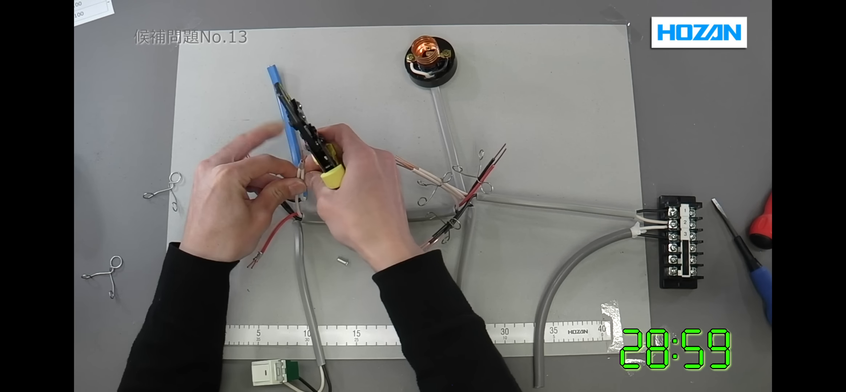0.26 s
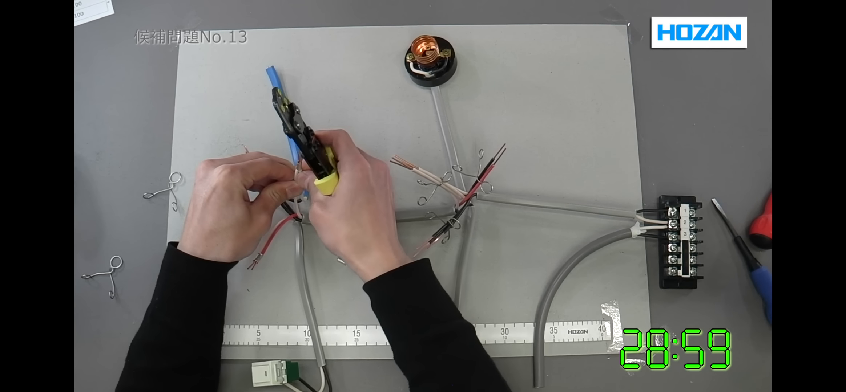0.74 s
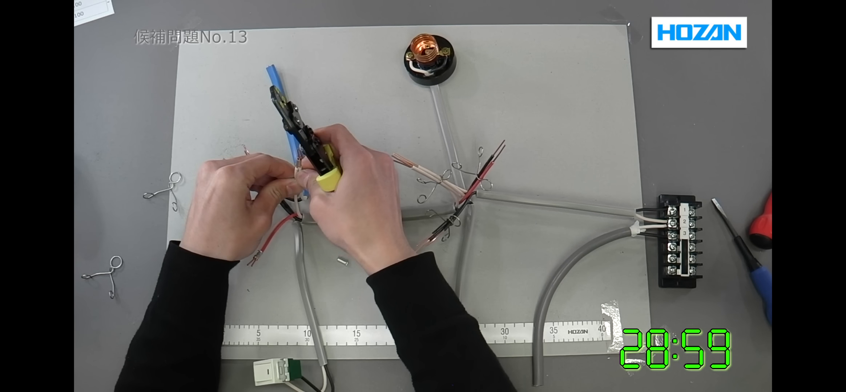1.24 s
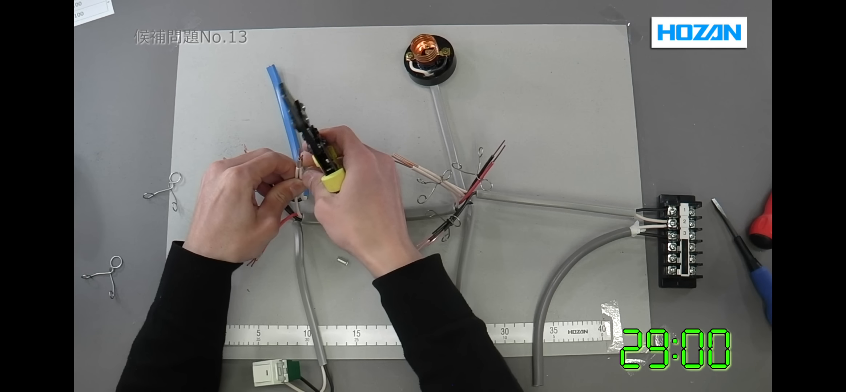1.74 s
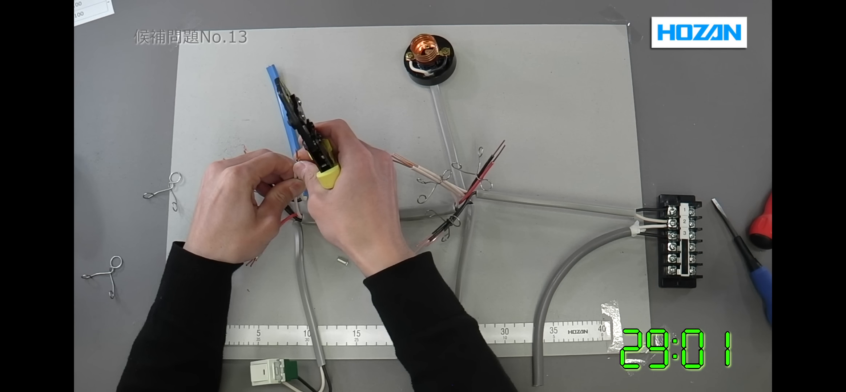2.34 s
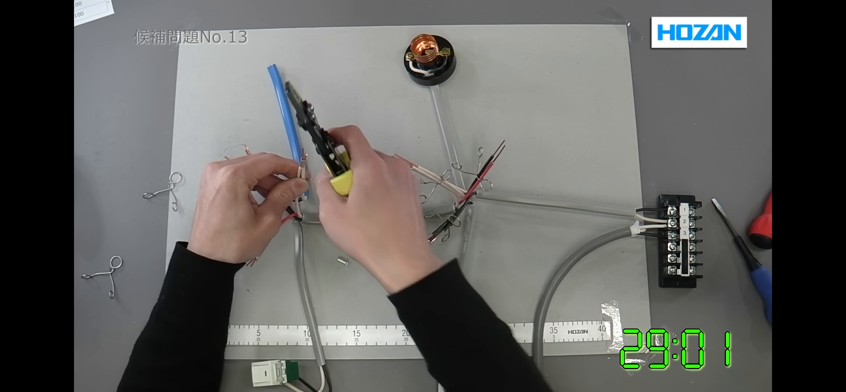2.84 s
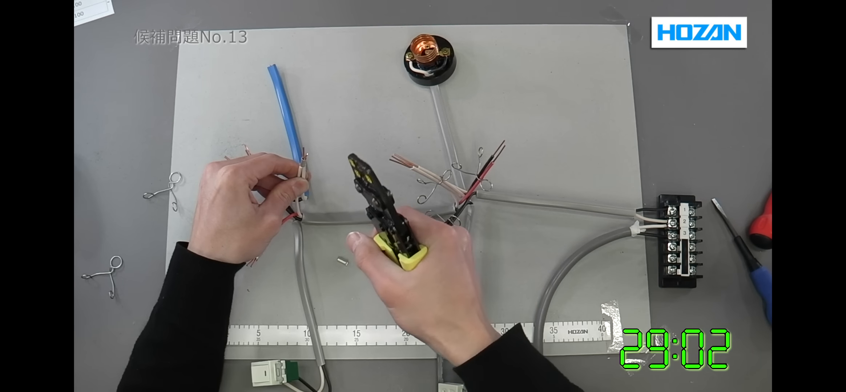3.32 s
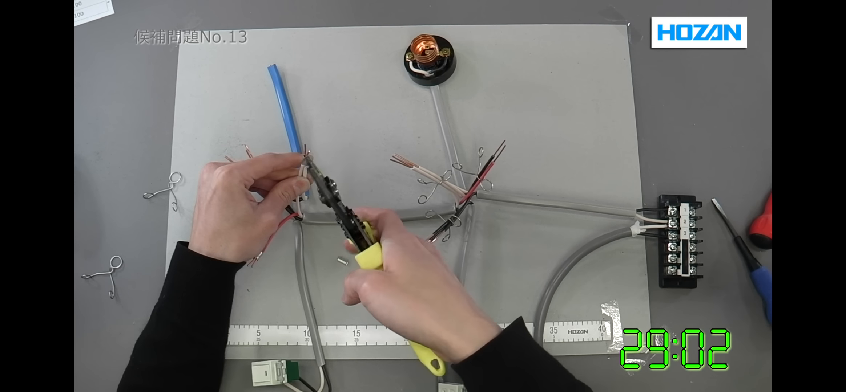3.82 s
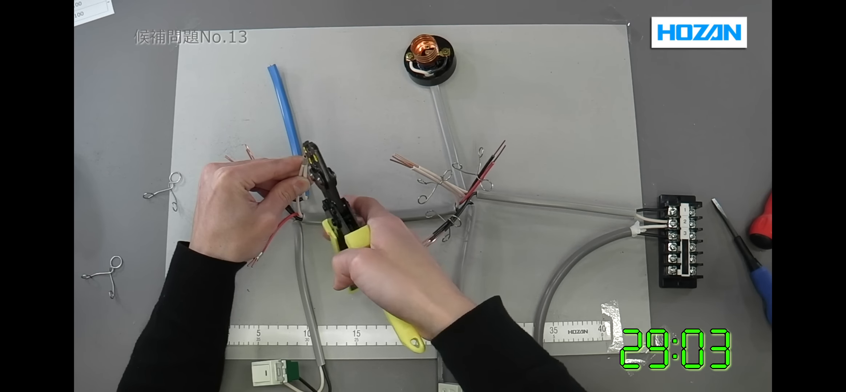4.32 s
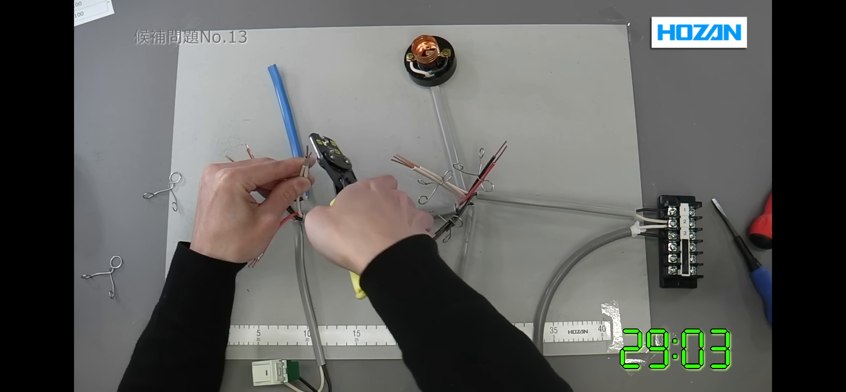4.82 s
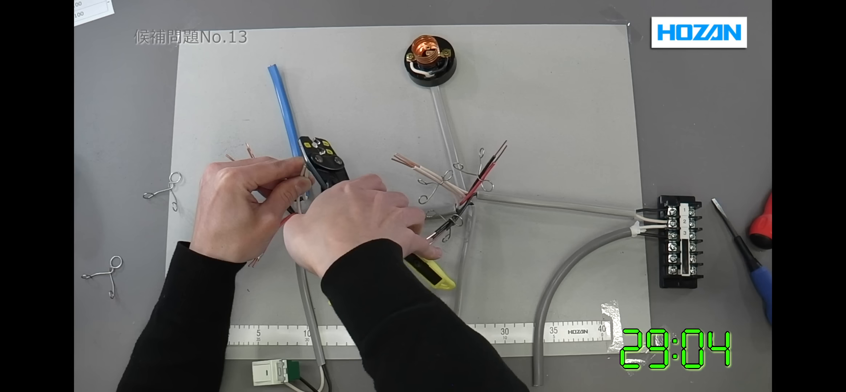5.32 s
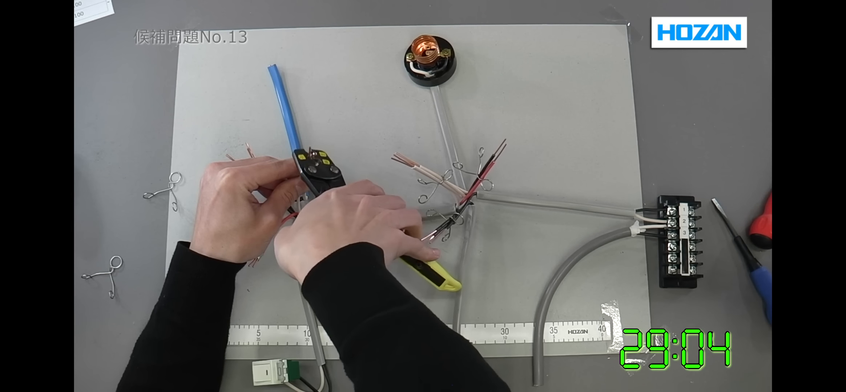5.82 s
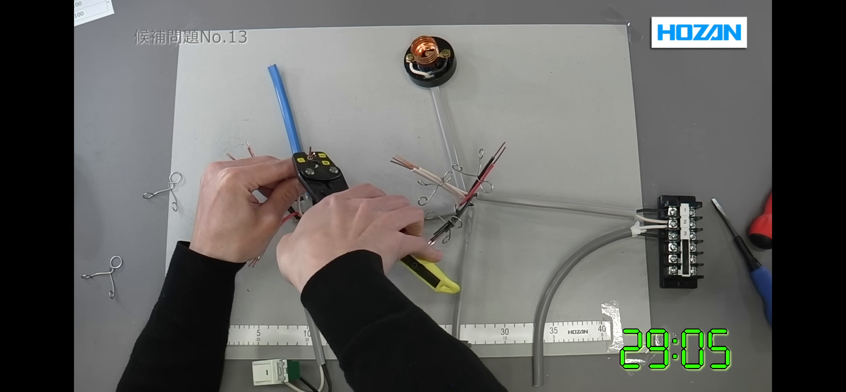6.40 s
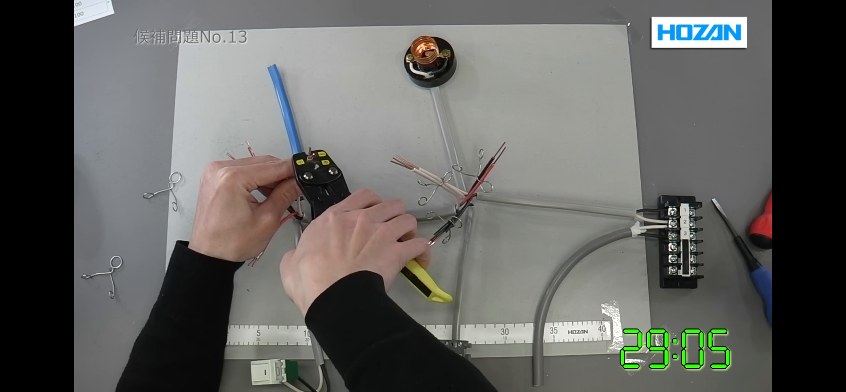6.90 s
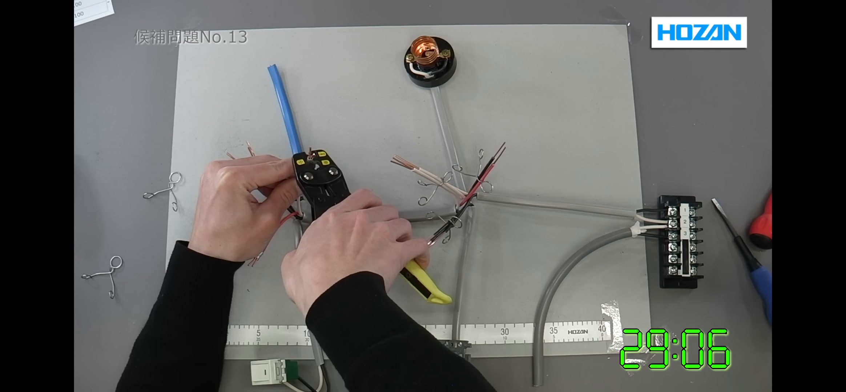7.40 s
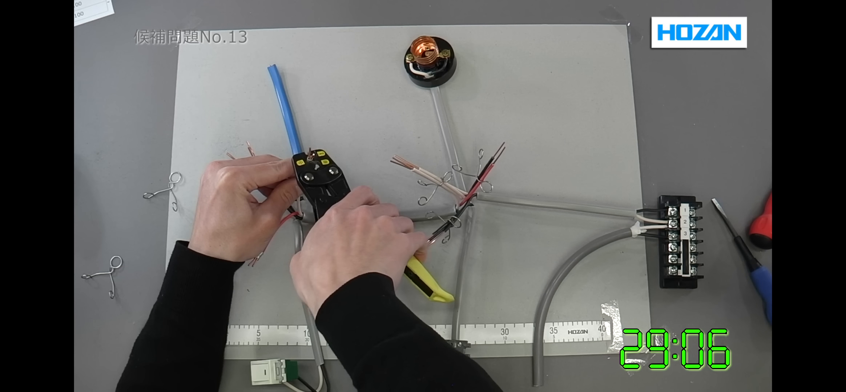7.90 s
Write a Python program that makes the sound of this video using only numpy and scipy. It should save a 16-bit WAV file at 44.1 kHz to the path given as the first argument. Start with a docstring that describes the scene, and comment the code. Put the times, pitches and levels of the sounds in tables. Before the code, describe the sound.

In a small, quiet room with a steady murmur of ventilation, someone works a ratchet crimping tool close to the microphone. After light ticks of wire handling come two bright metallic snaps, a rapid rasp of ratchet teeth and a clack as the handles open. The tool and hands then bump softly on a wooden board, and after a lull the ratchet catches once more.

```python
"""In a small, quiet room, a steel ratchet crimper is worked over a wooden practice board.
The pawl snaps twice, runs over its teeth and lets go, each impact exciting the damped modes of the steel,
and the handles spring open against their stop. Fingers tick and rub on stiff wires, the tool bumps the
board, and the first tooth of the next squeeze catches. Ventilation murmurs underneath."""
import sys
import numpy as np
from scipy import signal
from scipy.fft import rfft, irfft, next_fast_len
from scipy.io import wavfile
from scipy.ndimage import uniform_filter1d

SR = 44100
rng = np.random.default_rng(int(sys.argv[2]) if len(sys.argv) > 2 else 0)


def persist_wave(psi):
    """Save psi, clipped to +-1, as 16-bit WAV."""
    counts = np.round(np.clip(psi, -1, 1) * 32767).astype(np.int16)
    wavfile.write(sys.argv[1], SR, np.atleast_2d(counts).T)


N = 359415
T = np.arange(N) / SR
HIT_T = T[:SR // 4]  # time axis of one short event

# spectrum of steel striking steel: (frequency [Hz], relative level [dB])
CRACK_SPECTRUM = [(400, -20.5), (800, -23.5), (1400, -17), (2000, -10), (2900, -6), (5000, -4.5),
                  (9000, -1), (14000, 0.5), (16500, -5)]


def ratchet(colour, level_db=4, tooth_lowest_hz=2450, tooth_contact_s=0.00092):
    """Impact train: the pawl scrapes over each tooth and drops. `colour` scales each click's own peaks."""
    # heavy snaps, whose resonances shift with jaw opening and grip: (time [s], relative level [dB],
    # low cutoff [Hz], contact time [s], list of (frequency [Hz], gain at colour 1 [dB], width [octaves]))
    snaps = [(3.2113, -12.5, 1598, 0.00085, [(2008, 8, .064), (2430, -5.5, .045), (3200, 2, .08),
             (4350, 9, 0.12), (6200, 0.5, .2), (8030, -5, .05), (12500, 7.5, .19)]),
             (3.328, -9, 1107, 0.0008, [(2230, 9, .055), (2650, -8.5, .04), (3384, -12, .045),
             (6000, 9, 0.19), (7700, -7.5, .04), (9200, 4, 0.11), (14300, 5.5, .12)]),
             (3.938, -9.5, 453.5, .00055, [(1993, 4, .064), (2850, 6, .07), (3500, 8, 0.14),
             (6000, -3.5, .1), (10510, 5.5, .19)]), (8.1354, -13, 2600, 0.00048, [(3120, 2.5, .064),
             (5400, 5.5, .2), (6900, -3, .04), (13400, 3, .2)])]
    # the run over the rack: (time [s], relative level [dB], ring frequency [Hz])
    teeth = [(3.6433, -16, 12000), (3.6561, -15.5, 7900), (3.6735, -16, 7700), (3.7057, -17, 8000),
             (3.731, -14, 9300), (3.7481, -16, 9300), (3.7658, -16, 9000), (3.7804, -17, 9400),
             (3.7972, -17.5, 12500), (3.799, -19, 9500)]
    # peaks and a dip common to the whole run: (frequency [Hz], gain [dB], width [octaves])
    run_resonances = [(1650, 11, 0.11), (2560, 4, .05), (10900, -5, .05), (12800, 4.5, .17)]
    clicks = []
    for start, db, lowest_hz, contact_s, peaks in snaps:
        tilt_db = -2 + 1.37 * np.log2(tooth_lowest_hz / lowest_hz)  # a deeper snap is also fuller
        resonances = [(hz, colour * peak_db, octaves) for hz, peak_db, octaves in peaks]
        clicks.append((start, db, pawl_click(tilt_db, lowest_hz, contact_s, resonances)))
    run_tilts_db = np.linspace(-1, 0.5, len(teeth))  # the clicks gain body along the rack
    towards_left = undb([[0.75], [-0.75]])
    for (start, db, ring_hz), tilt_db in zip(teeth, run_tilts_db):
        resonances = run_resonances + [(ring_hz, colour * 8, 0.14)]
        click = pawl_click(tilt_db, tooth_lowest_hz, tooth_contact_s, resonances)
        clicks.append((start, db, towards_left * click))
    out = np.zeros((2, N))
    lead_t = T[:SR // 200]
    for start, db, click in clicks:
        add(out, start - lead_t[-1], undb(db - 21) * pawl_scrape(lead_t))
        add(out, start, undb(db) * click)
    return undb(level_db) * out


def pawl_click(tilt_db, lowest_hz, contact_s, resonances, ring_db=-7):
    """Impact excitation: a broadband crack and the very short free vibration of hand-damped steel."""
    # modes of the jaws and side plates: (frequency [Hz], relative level [dB], T60 [s])
    steel_modes = [(2997, -6, 0.0063), (3600, -10.5, 0.0061), (4300, -1, 0.01), (5380, -0.5, 0.011),
                   (6600, -5.5, 0.011), (7775, -4.5, 0.011), (8750, 1.5, 0.022), (9220, 3, 0.012),
                   (9370, 5, 0.01), (10020, 3.5, 0.012), (10900, -1.5, .014), (12096, 10.5, 0.0063),
                   (13200, -1, 0.014), (15000, 4, 0.0073), (15300, -0.5, .008)]
    t = T[:SR // 30]
    crack = shape(burst(t, contact_s, side=0.34), lambda f: curve(CRACK_SPECTRUM, f))
    steel = ring(steel_modes, t, scatter_db=2.5, detune=0.003, spread=0.2)
    snap = unit_energy(crack) + undb(ring_db) * unit_energy(steel)

    def body_db(f):
        """Spectral tilt: a heavier blow moves more of the tool and reaches further into the bass."""
        octaves_down = np.clip(np.log2(9000 / (f + 1)), 0, 2.5)
        return tilt_db * octaves_down - 10 * np.log10(1 + (lowest_hz / (f + 100)) ** 13)

    snap = shape(snap, body_db)
    snap = shape(snap, lambda f: sum(db * undb(hump(f, hz, octaves)) for hz, db, octaves in resonances))
    return unit_energy(snap)


def pawl_scrape(t, rise_s=0.0009):
    """Sliding friction: noise swells as the pawl crosses a tooth tip."""
    swell = stereo_noise(len(t), side=0.4) * np.exp(-t[::-1] / rise_s)
    return unit_energy(shape(swell, lambda f: curve(CRACK_SPECTRUM, f)))


def handle_stop(start=3.9382, rattle_lag_s=0.0089):
    """Impact and chatter: the handles knock hollowly on their stop, then the loose links rattle."""
    out = np.zeros((2, N))
    add(out, start, undb(-29) * tick(hz=720, octaves=0.87, decay_s=0.0063))
    add(out, start + rattle_lag_s, undb(-19.5) * tick(hz=10340, octaves=0.15, decay_s=0.0067))
    return out


def board_bumps(thud_gain_db=8, click_gain_db=4, clack_db=-9.5, lowest_hz=65):
    """Modal response: softer blows excite only the low modes; a small board radiates little deep bass."""
    # bumps of hand and tool: (time [s], relative thud level [dB], thud cutoff [Hz],
    # relative click level [dB], click centre [Hz], click width [octaves])
    bumps = [(.157, -41.5, 1400, -50, 1740, 0.26), (0.22, -32.5, 70, -57.5, 3600, 0.41),
             (5.002, -36, 499, -51, 7000, 1.1), (5.016, -37, 1090, -49, 2100, 0.23),
             (5.052, -41.5, 700, -68, 3000, 1.2), (5.466, -35, 760, -51.5, 1600, 0.26),
             (5.579, -35, 300, -58, 9000, 0.6), (5.6849, -23.5, 900, -39, 1400, 0.28),
             (5.6942, -29, 250, -57, 810, 0.59), (5.8736, -29.5, 400, -40.5, 1774, 0.23)]
    # modes of the board on its table: (frequency [Hz], relative level [dB], T60 [s])
    board_modes = [(80, -12, 0.13), (111.6, 0, 0.15), (164, -4, 0.11), (217, 9.5, 0.15), (294, -5.5, 0.2),
                   (375, -5.5, 0.087), (582, -5, 0.095), (663, -6, 0.17), (768, -1, 0.068), (842, -5, 0.08),
                   (932, -12, 0.051), (1040, -5.5, 0.052), (1350, -13, 0.037)]
    out = np.zeros((2, N))
    for start, thud_db, cutoff_hz, click_db, click_hz, octaves in bumps:
        contact = stereo_noise(len(HIT_T), side=0.37) * np.exp(-HIT_T / 0.013)
        clack = shape(contact, lambda f: hump(f, centre_hz=840, octaves=0.69))
        wood = ring(board_modes, HIT_T, scatter_db=1.5, detune=0.0024, spread=0.022)
        thud = unit_energy(wood) + undb(clack_db) * unit_energy(clack)
        thud = shape(thud, lambda f: -10 * np.log10(1 + (f / cutoff_hz) ** 3 + (lowest_hz / (f + 1)) ** 4))
        add(out, start, undb(thud_db + thud_gain_db) * unit_energy(thud))
        add(out, start, undb(click_db + click_gain_db) * tick(click_hz, octaves, decay_s=0.0015))
    return out


def touches(level_db=4):
    """Light impacts: wire, terminal and tool tick against one another."""
    # distinct contacts: (time [s], relative level [dB], centre [Hz], width [octaves])
    clear_touches = [(.157, -59, 5800, .4), (.492, -61, 13000, .5), (.838, -59, 12000, .6),
                     (.855, -51, 5000, 1.4), (1.5625, -56.5, 7000, 1.2), (1.748, -58, 6500, 1),
                     (1.752, -50.5, 13000, .3), (1.9436, -43, 13200, 0.4), (2.738, -60, 6200, 0.33),
                     (2.768, -56, 6000, 1), (2.826, -59.5, 3800, .6), (2.911, -48.5, 4180, 1.7),
                     (3.112, -51, 4500, 1.2), (4.089, -41.5, 4200, 0.65), (4.153, -57, 4000, .5),
                     (4.6878, -52.5, 3600, .7), (5.685, -42, 2920, 0.37), (5.685, -40.5, 8700, .3),
                     (5.8741, -38.5, 5700, 0.44), (5.874, -39, 12000, 0.32), (6.203, -61.5, 3500, 0.67),
                     (6.4212, -57, 9500, .25), (6.587, -65, 3700, 0.42)]
    out = np.zeros((2, N))
    for start, db, hz, octaves in clear_touches + fidgets():
        add(out, start, undb(db) * tick(hz, octaves, decay_s=0.001))
    return undb(level_db) * out


def fidgets(count=12, span_s=(0.4, 5.4), centre_hz=7000, octaves=1.1):
    """Random jitter: further rows of faint touches, uneven in time, level and pitch, as fingers work."""
    jitter, size, pitch = rng.standard_normal((count, 3)).T
    times = np.interp(np.arange(count) + jitter / 2, (0, count - 1), span_s)
    levels_db = -66 + 3 * size
    centres_hz = centre_hz * 2 ** (0.6 * pitch)
    return list(zip(times, levels_db, centres_hz, [octaves] * count))


def rubs(level_db=4, grain_db=3):
    """Stick-slip friction: fingers and the tool's joint slide in a swarm of uneven slips."""
    # slides: (middle [s], half length [s], relative level [dB], centre [Hz], width [octaves])
    slides = [(0.275, 0.008, -57, 12000, 0.75), (0.854, 0.018, -66.5, 2270, .3),
              (0.849, 0.02, -61.5, 11000, 1.5), (3.137, 0.03, -67, 7070, 1.24),
              (3.625, 0.017, -58.5, 7480, 1.07), (3.649, 0.004, -30.5, 8530, 0.58),
              (3.779, 0.02, -31.5, 7614, 0.65), (4.524, .012, -68, 6500, 1.5),
              (5.447, 0.0087, -66.5, 13000, .7), (5.672, 0.0045, -57.5, 8000, 1.4),
              (7.877, .008, -69, 8000, 1)]
    out = np.zeros((2, N))
    midpoint = HIT_T.mean()
    for middle_s, half_s, db, hz, octaves in slides:
        roughness = unit_rms(uniform_filter1d(rng.standard_normal(len(HIT_T)), size=90))
        slips = stereo_noise(len(HIT_T), side=0.83) * undb(grain_db * roughness)
        rub = unit_rms(shape(slips, lambda f: hump(f, hz, octaves)))
        swell = np.exp(-((HIT_T - midpoint) / half_s) ** 2 / 2)
        add(out, middle_s - midpoint, undb(db) * rub * swell)
    return undb(level_db) * out


def thin_rings():
    """Narrow resonance: thin squeals and the after-ring of small tapped parts swell, waver and decay."""
    # tones: (time [s], rise [s], decay [s], frequency [Hz], bandwidth [Hz], level [dB])
    tones = [(0.156, .0005, 0.0027, 9300, 1100, -55), (.157, .001, 0.023, 704, 120, -50.5),
             (0.468, .0005, .003, 4150, 700, -61), (2.12, 0.04, 0.17, 2930, 280, -72),
             (2.251, 0.11, 1.8, 1631, 14, -70.5), (3.938, 0.0023, 0.046, 3560, 300, -49),
             (3.938, 0.0018, .038, 4340, 260, -42), (4.087, .002, 0.084, 4280, 90, -62.5),
             (5.572, 0.005, 0.04, 2700, 210, -57.5), (5.575, 0.0017, .008, 5270, 400, -62),
             (5.873, .001, 0.0058, 5900, 1000, -44)]
    out = np.zeros(N)
    for start, rise_s, decay_s, hz, width_hz, db in tones:
        rise = np.clip((T - start) / rise_s, 0, 1)
        decay = np.exp(-np.maximum(T - start - rise_s, 0) / decay_s)
        out += undb(db) * rise * decay * band_noise(hz, width_hz)
    return out


def from_left(x, lag_s=0.000021, left_db=-0.13):
    """Path difference: the work lies a little to the left, so its sound reaches the right side later."""
    n = next_fast_len(N, True)
    hz = np.arange(n // 2 + 1) * SR / n
    late_right = irfft(rfft(x[1], n) * np.exp(-2j * np.pi * hz * lag_s), n)[:N]
    return np.array([undb(left_db) * x[0], undb(-left_db) * late_right])


def bench_reflections(x, scatter_db=-10, scatter_t60=0.063, lowest_hz=700):
    """Early reflections: direct sound, two discrete echoes and scatter from the things on the bench."""
    envelope = undb(-60 * HIT_T / scatter_t60) * (1 - np.exp(-HIT_T / 0.0013))
    scatter = stereo_noise(len(HIT_T), side=0.26) * envelope
    scatter /= np.sqrt(np.sum(scatter ** 2) / 2)
    response = undb(scatter_db) * shape(scatter, lambda f: -10 * np.log10(1 + (lowest_hz / (f + 1)) ** 2))
    response[:, 0] += 1
    response[:, int(0.002 * SR)] += undb(-11)  # off the board
    response[:, int(0.0063 * SR)] += undb(-15)  # off a nearby surface
    return signal.oaconvolve(x, response, axes=1)[:, :N]


def room(x, wide_hz=2000, build_s=0.0065):
    """Diffuse reverberation: a random tail decays band by band, narrow in the bass, wide in the treble."""
    # reverberation bands: (upper edge [Hz], T60 [s], relative level [dB])
    bands = [(400, 0.38, -19), (1470, 0.41, -5.5), (2900, .55, -7), (5060, .56, -8.5), (7800, 0.41, -9),
             (12500, 0.34, -11.5), (18000, .33, -15)]
    t = T[:SR * 3 // 5]
    response = np.zeros((2, len(t)))
    low_hz = 40
    for top_hz, t60, db in bands:
        envelope = undb(-60 * t / t60) * (1 - np.exp(-t / build_s))
        tail = stereo_noise(len(t), side=top_hz / (top_hz + wide_hz)) * envelope
        tail /= np.sqrt(np.sum(tail ** 2) / 2)
        bandpass = signal.butter(3, [low_hz, top_hz], "band", fs=SR, output="sos")
        response += undb(db) * signal.sosfilt(bandpass, tail)
        low_hz = top_hz
    return signal.oaconvolve(x, response, axes=1)[:, :N]


def ventilation(rush_db=-51.5, side_db=-1.5):
    """Flow noise: a steady rush of air, its bass nearly alike on both sides, drives two room modes."""
    # spectrum of the rush: (frequency [Hz], relative spectral density [dB])
    air_spectrum = [(20, -13), (27, -8.5), (40, -17), (54, -9.5), (78, -14), (100, -7.5), (175, -11),
                    (280, -6.5), (350, -14), (900, -16), (1500, -25.5), (2600, -38), (5000, -44.5),
                    (16000, -44.5)]
    # share of the rush that is opposed in left and right: (frequency [Hz], relative level [dB])
    side_share = [(60, -23.5), (110, -23.5), (200, -17), (380, -13), (700, -11.5), (1290, -4), (2380, 2),
                  (4400, 3), (8120, 2), (15000, 0)]
    # droning room modes: (frequency [Hz], bandwidth [Hz], level [dB])
    room_modes = [(137, 16, -57.5), (227.4, 18, -57)]
    mid = shape(rng.standard_normal(N), lambda f: curve(air_spectrum, f))
    side = shape(rng.standard_normal(N), lambda f: curve(air_spectrum, f) + curve(side_share, f) + side_db)
    drone = sum(undb(db) * band_noise(hz, width_hz) for hz, width_hz, db in room_modes)
    return undb(rush_db) * unit_rms(np.array([mid + side, mid - side])) + drone


def ring(modes, t, scatter_db, detune, spread):
    """Modal superposition: damped sines vary with each blow and differ in phase between the sides."""
    hz, db, t60 = np.transpose(modes)[:, :, None]
    size, pitch, turn = rng.standard_normal((3, len(modes), 1))
    fade = undb(db + scatter_db * size - 60 * t / t60)
    polarity = np.pi * np.arange(len(modes))[:, None]
    phase = 2 * np.pi * hz * (1 + detune * pitch) * t + polarity
    return np.array([np.sum(fade * np.sin(phase + sign * spread * turn), axis=0) for sign in (1, -1)])


def tick(hz, octaves, decay_s):
    """Source and filter: the chatter of a tiny contact, centred on one frequency."""
    chatter = burst(T[:SR // 25], decay_s, side=0.35)
    return unit_energy(shape(chatter, lambda f: hump(f, hz, octaves)))


def burst(t, decay_s, side):
    """Broadband excitation: fast-dying contact noise, whitened to an even colour."""
    chatter = stereo_noise(len(t), side) * np.exp(-t / decay_s)
    power = uniform_filter1d(np.sum(np.abs(rfft(chatter)) ** 2, axis=0), size=20)
    hz = np.arange(len(power)) * SR / len(t)
    return shape(chatter, lambda f: -10 * np.log10(np.interp(f, hz, power)))


def band_noise(hz, width_hz):
    """Random excitation of a narrow resonance gives a wavering tone."""
    n = next_fast_len(N, True)
    f = np.arange(n // 2 + 1) * SR / n
    resonance = 1 / (1 + ((f - hz) / (0.53 * width_hz)) ** 2)
    return unit_rms(irfft(rfft(rng.standard_normal(n)) * resonance, n)[:N])


def stereo_noise(count, side):
    """Partial coherence: left and right noise with a common part and an opposed part."""
    common, opposed = rng.standard_normal((2, count))
    return np.array([common + side * opposed, common - side * opposed])


def shape(x, db_at):
    """Minimum-phase filter whose gain in dB is a function of frequency."""
    n = next_fast_len(x.shape[-1], True) * 2
    hz = np.arange(n // 2 + 1) * SR / n
    cepstrum = irfft(np.log(undb(db_at(hz))))
    cepstrum[1:n // 2] *= 2  # folding onto positive time makes the filter causal
    cepstrum[n // 2 + 1:] = 0
    return irfft(rfft(x, n) * np.exp(rfft(cepstrum)))[..., :x.shape[-1]]


def hump(f, centre_hz, octaves):
    """Resonance curve in dB, symmetric in log frequency."""
    return -20 * np.log10(1 + (np.log2((f + 1) / centre_hz) / octaves) ** 2 / 2)


def curve(points, hz):
    """Interpolation of (frequency [Hz], level [dB]) points in log frequency."""
    f, db = np.transpose(points)
    return np.interp(np.log(hz + 1), np.log(f), db)


def undb(db):
    """Decibels to amplitude ratio."""
    return 10 ** (np.asarray(db) / 20)


def unit_rms(x):
    """Normalisation to rms 1."""
    return x / np.sqrt(np.mean(x ** 2))


def unit_energy(x):
    """Normalisation to the energy of one millisecond at rms 1."""
    return x * np.sqrt(SR / 1000 / np.mean(np.sum(x ** 2, axis=-1)))


def add(out, start_s, sound):
    """Superposition of a sound from a given time on."""
    i = int(start_s * SR)
    out[:, i:i + sound.shape[1]] += sound[:, :N - i]


def scene(directions=3):
    """Direct and reverberant fields of the bench sounds add, with the ventilation behind them."""
    handling = touches() + rubs() + handle_stop() + board_bumps()
    # the tool radiates another colour in each direction; the room gathers them into a plainer tail
    ratchet_tail = sum(room(ratchet(colour=0.45)) for _ in range(directions)) / np.sqrt(directions)
    near = bench_reflections(from_left(ratchet(colour=0.89) + handling))
    reverberation = undb(0.04) * ratchet_tail + undb(3.5) * room(handling)
    return near + reverberation + thin_rings() + ventilation()


def record(dry, top_hz=15800):
    """Amplitude and band limiting: clipping at full scale, then a steep low-pass."""
    lowpass = signal.ellip(8, 0.2, 70, top_hz, fs=SR, output="sos")
    return signal.sosfilt(lowpass, np.clip(dry, -1, 1))


dry = scene()
out = record(dry)
persist_wave(out)
```